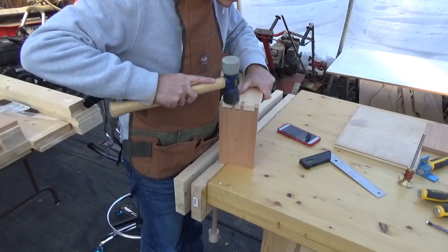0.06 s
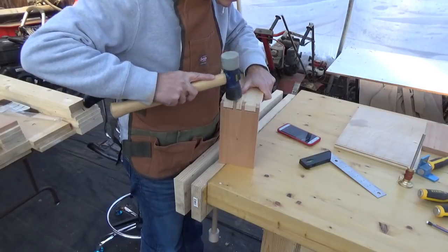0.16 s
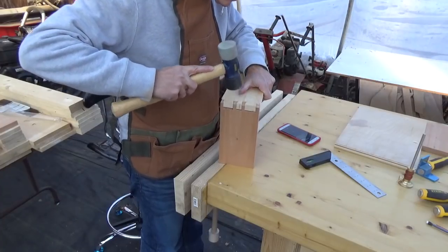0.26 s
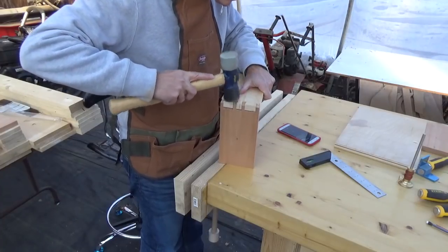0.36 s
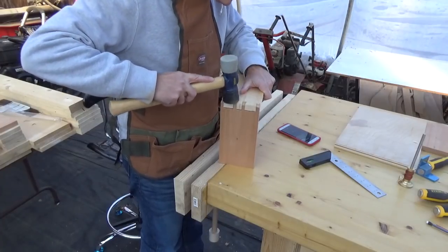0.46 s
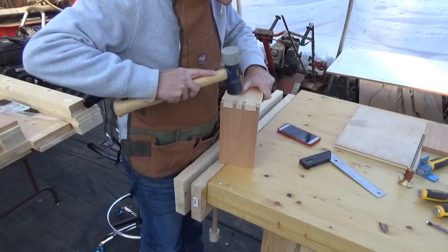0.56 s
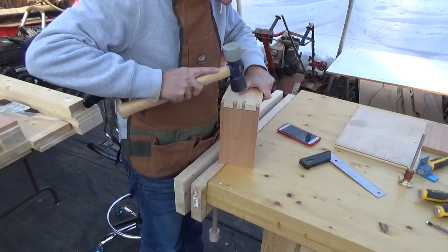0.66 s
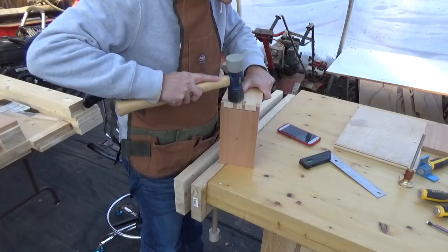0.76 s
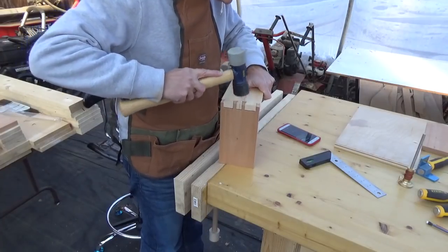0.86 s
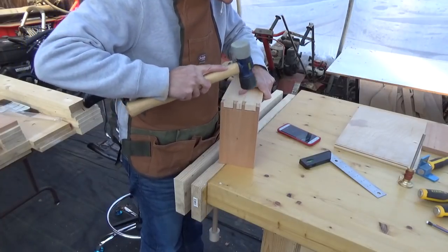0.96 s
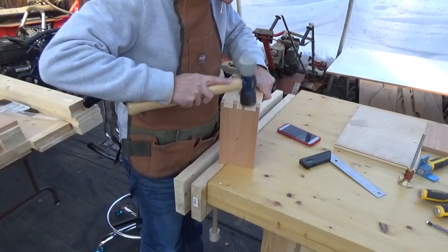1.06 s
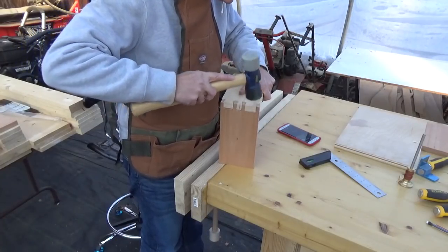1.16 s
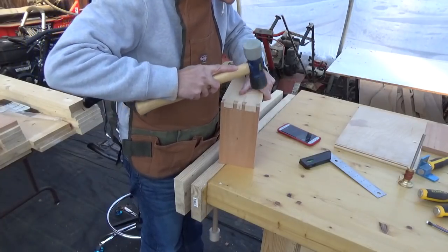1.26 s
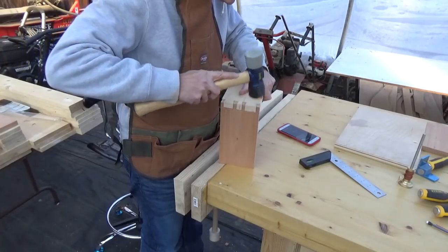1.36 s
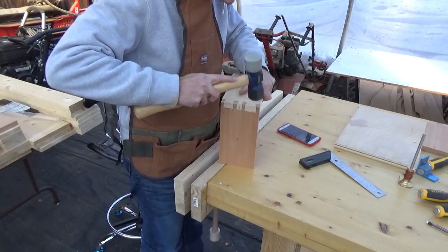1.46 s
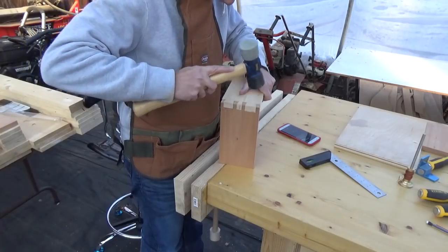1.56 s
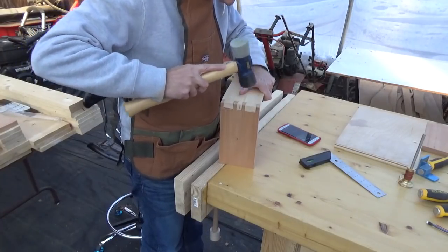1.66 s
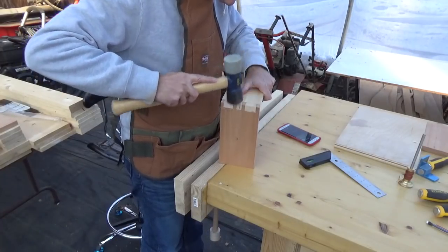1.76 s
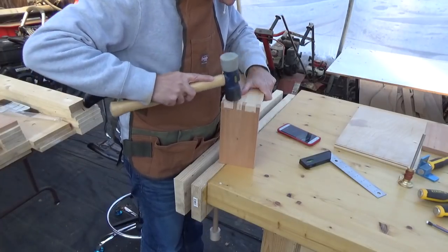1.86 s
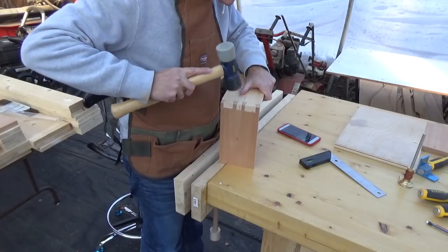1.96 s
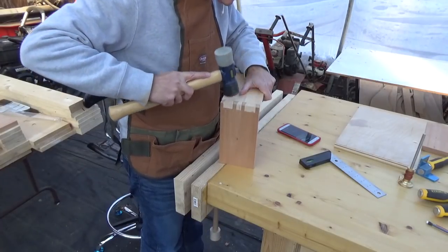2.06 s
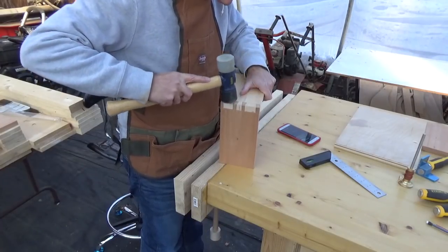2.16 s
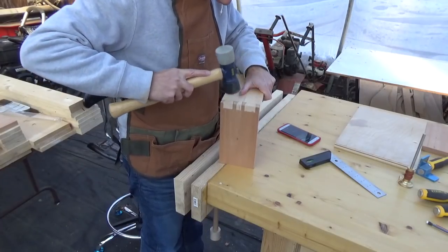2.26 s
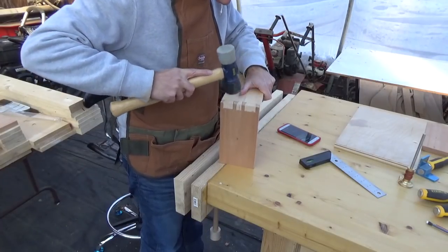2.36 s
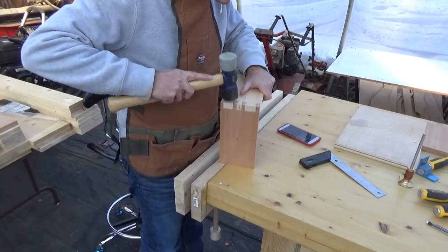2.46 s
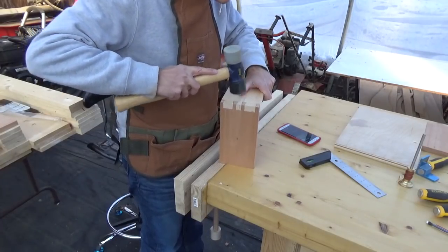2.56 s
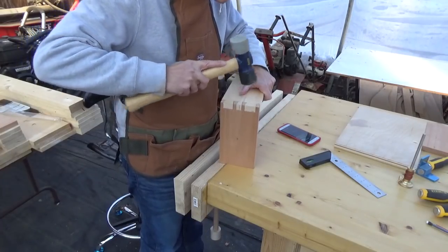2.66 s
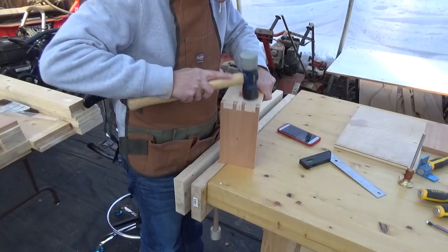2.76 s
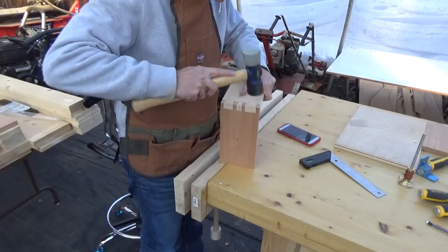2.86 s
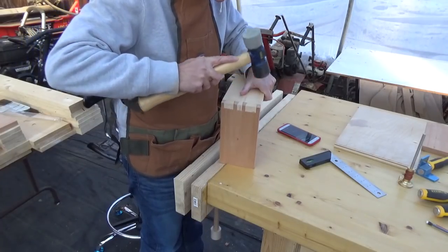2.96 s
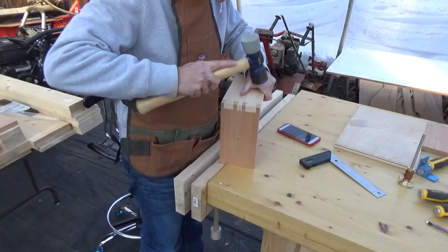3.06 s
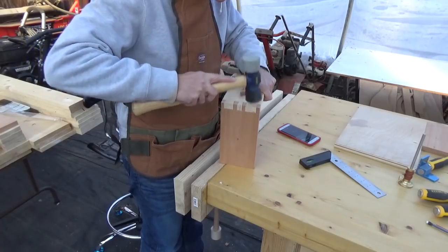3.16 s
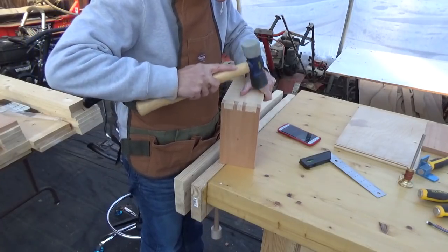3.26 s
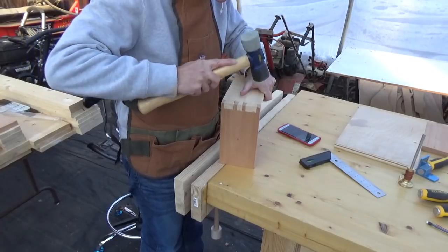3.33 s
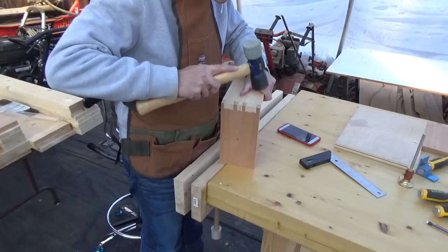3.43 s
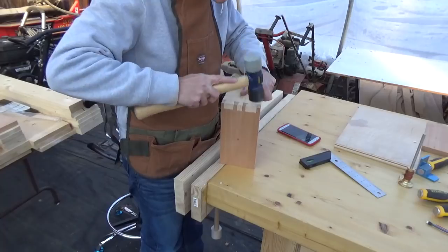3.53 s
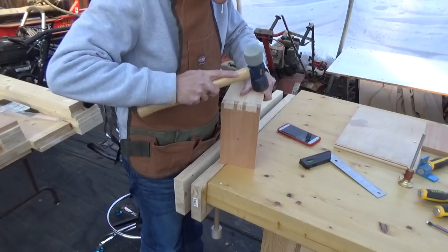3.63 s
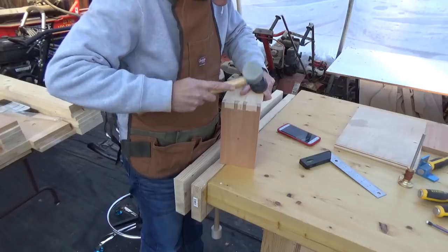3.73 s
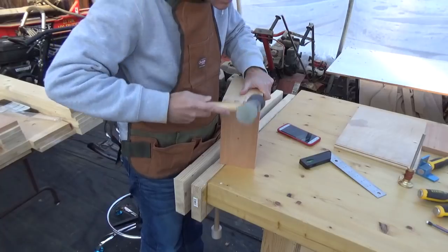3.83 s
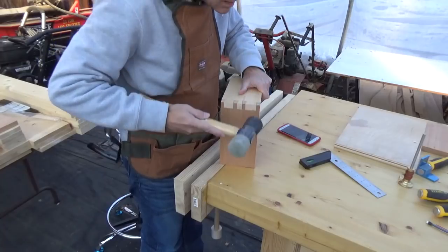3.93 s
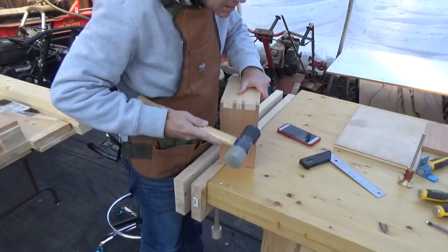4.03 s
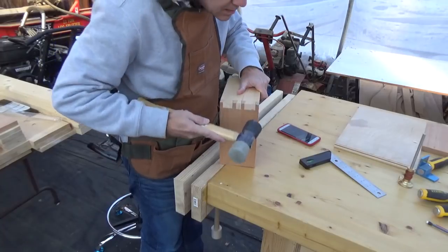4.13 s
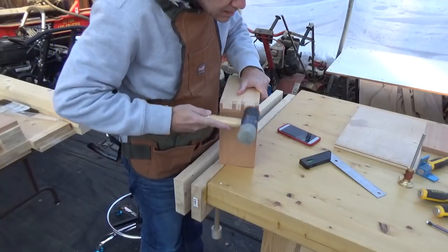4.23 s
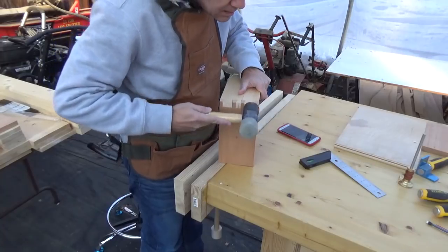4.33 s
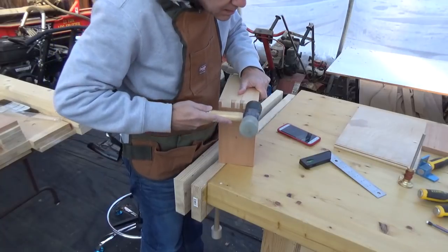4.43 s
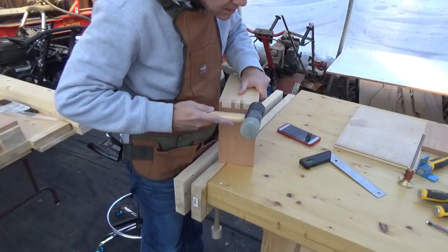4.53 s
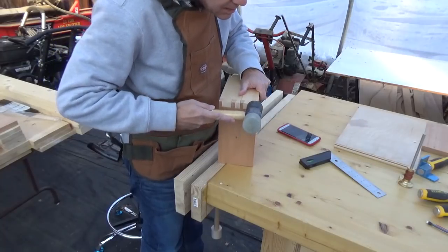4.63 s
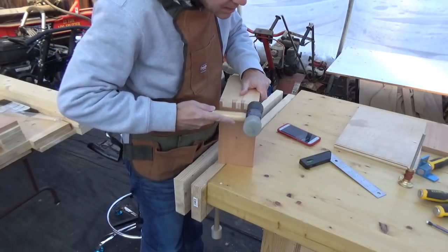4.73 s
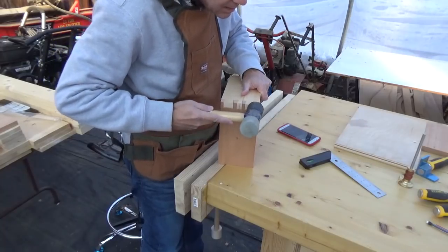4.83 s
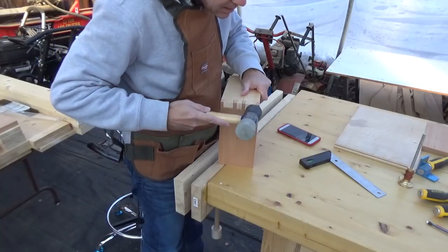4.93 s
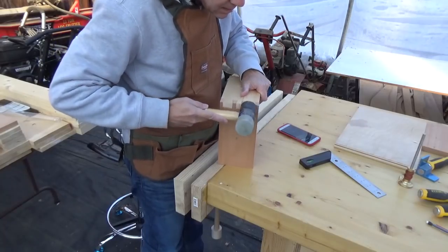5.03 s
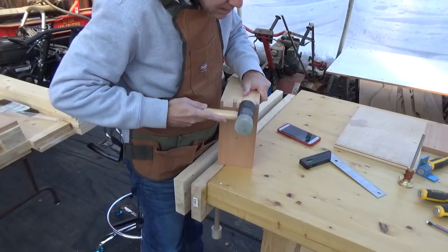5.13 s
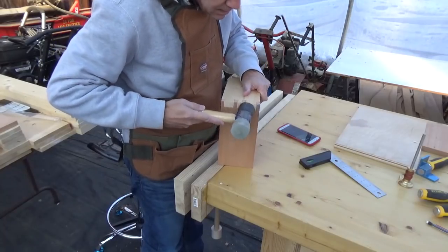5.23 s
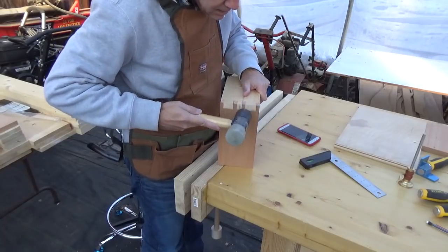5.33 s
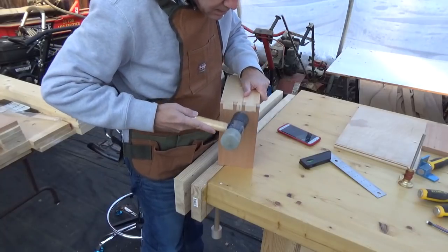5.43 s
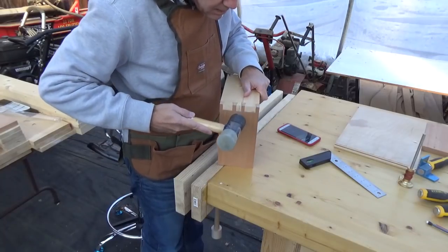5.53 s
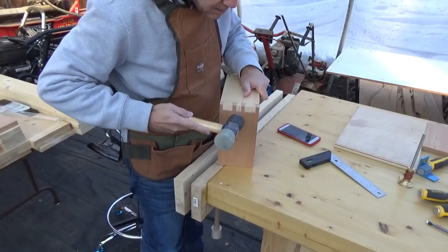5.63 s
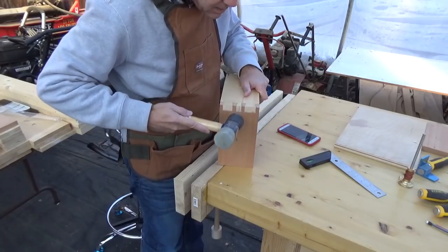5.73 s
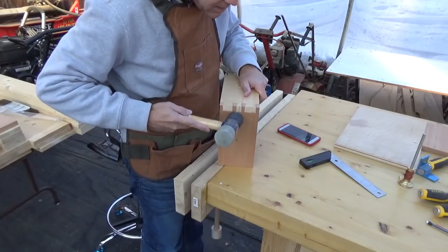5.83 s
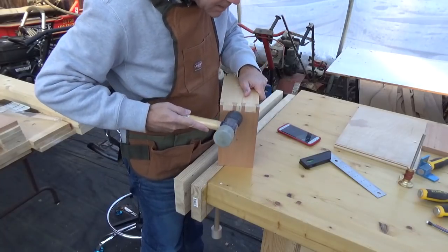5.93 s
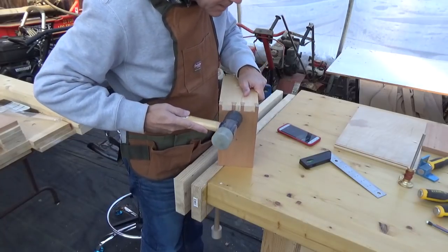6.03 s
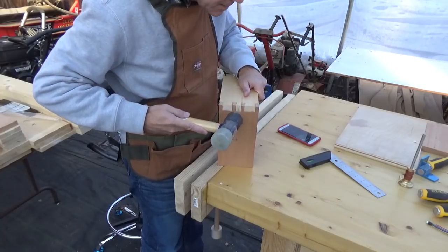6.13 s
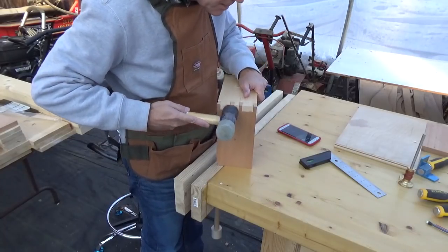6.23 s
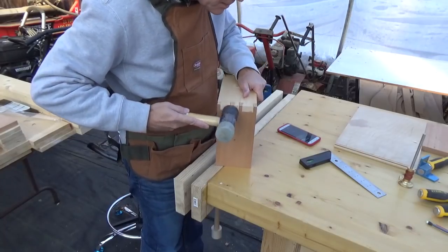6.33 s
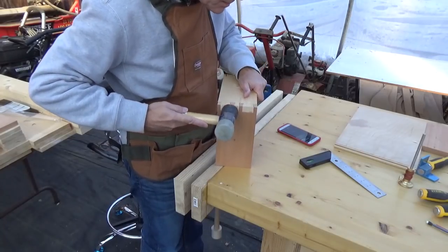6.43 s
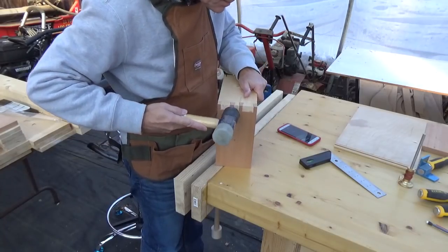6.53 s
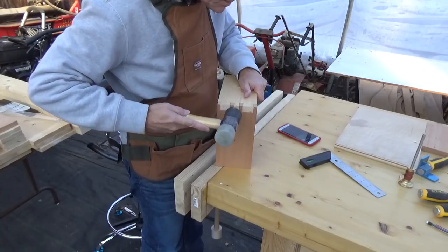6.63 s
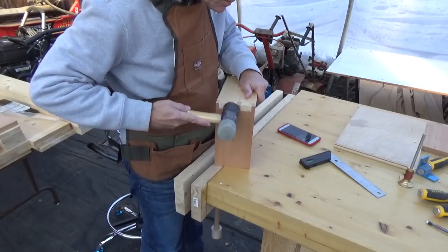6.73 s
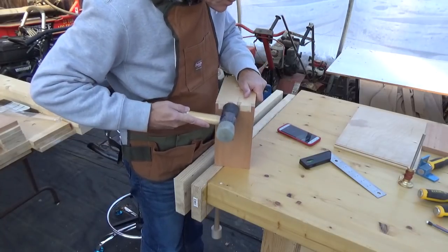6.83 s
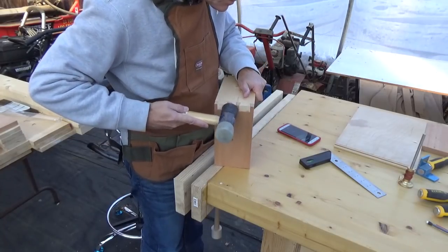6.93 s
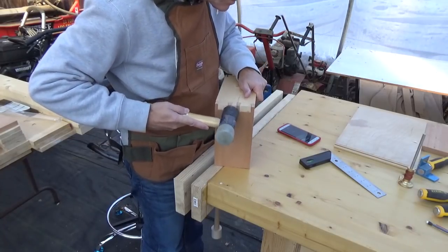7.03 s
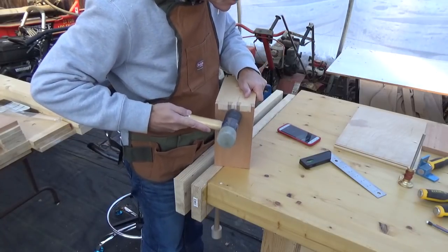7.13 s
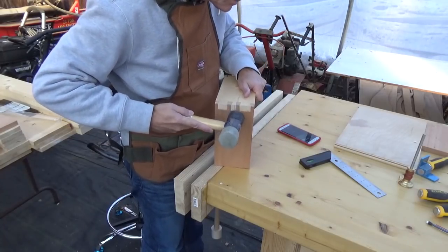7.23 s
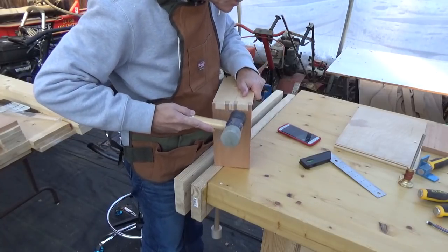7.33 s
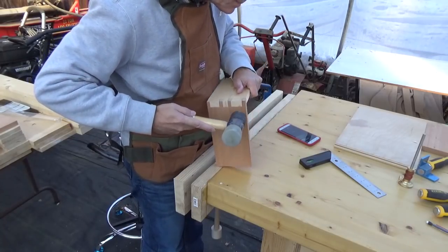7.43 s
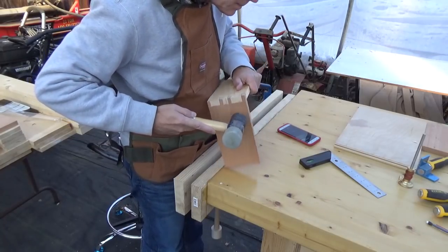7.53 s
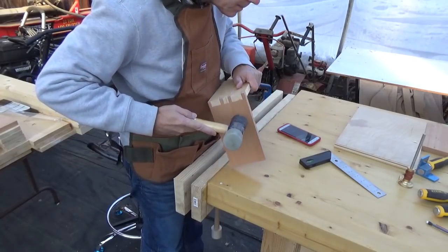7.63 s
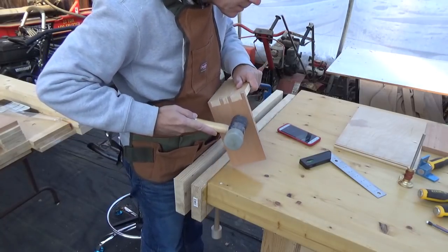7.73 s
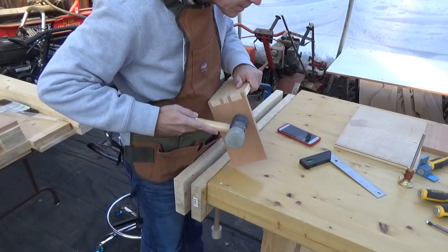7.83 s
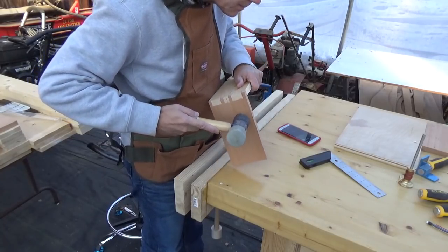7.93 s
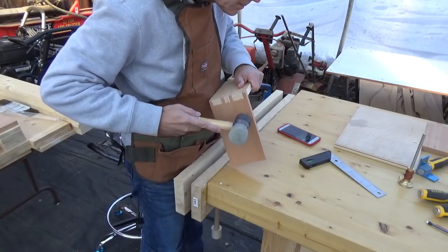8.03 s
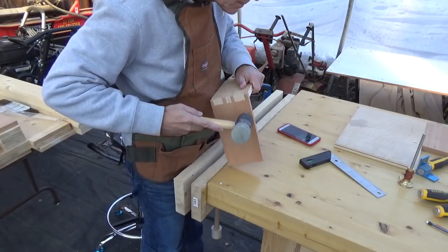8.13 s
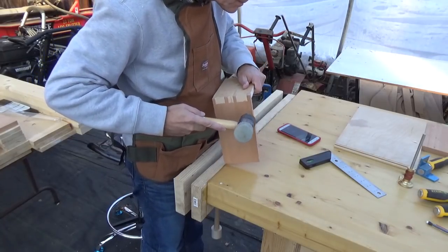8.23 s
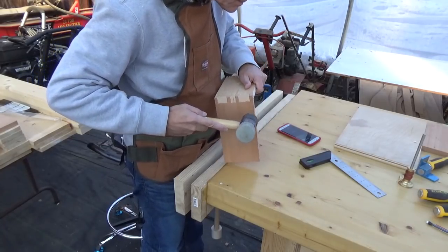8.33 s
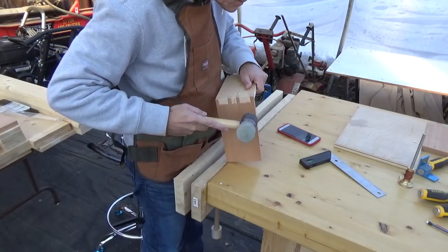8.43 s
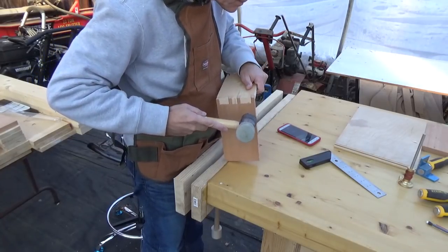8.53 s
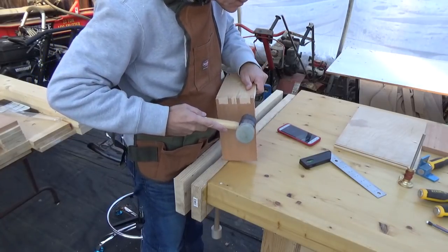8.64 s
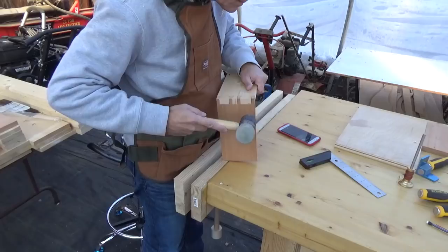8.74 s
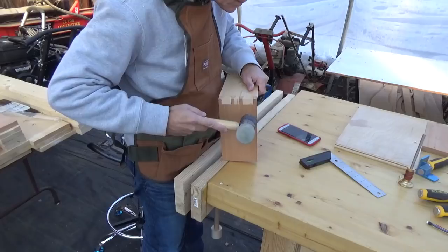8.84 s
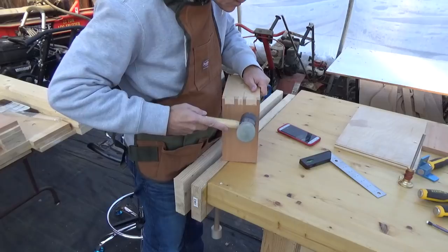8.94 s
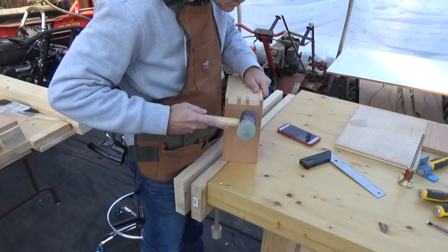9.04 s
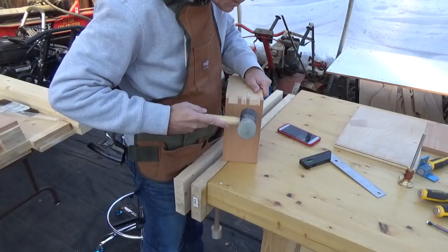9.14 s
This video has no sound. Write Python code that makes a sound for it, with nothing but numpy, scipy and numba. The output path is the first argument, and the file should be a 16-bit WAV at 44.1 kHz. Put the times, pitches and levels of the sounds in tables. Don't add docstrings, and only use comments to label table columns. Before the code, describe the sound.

Quick regular mallet blows thud on a wooden bench, a loose steel tool buzzing, then isolated hollow side taps and small wood scrapes over soft air noise.

```python
import sys
import numpy as np
from scipy import signal
from scipy.fft import rfft, irfft, next_fast_len
from scipy.io import wavfile
from numba import njit

SR = 44100
rng = np.random.default_rng(int(sys.argv[2]) if len(sys.argv) > 2 else 0)


def volts(x):
    e = np.asarray(x, float) / 20
    return 10 ** e


def int16_out(signal):
    q = np.round(np.clip(np.atleast_2d(signal).T, -1, 1) * 32767)
    wavfile.write(sys.argv[1], SR, q.astype(np.int16))


N = 405279
FAST = next_fast_len(N)
RING = int(0.5 * SR)

# frequency in Hz, spectrum level in dB per Hz.
AIR_SPECTRUM = [(15, -52), (25, 1.5), (64, -3.5), (81, -2.5), (104, -4.5), (242, -2), (320, -3.5),
                (363, -4.5), (506, -7.5), (1010, -10), (2790, -20.5), (5410, -21), (11000, -33.5),
                (14400, -98), (22000, -120)]
# frequency in Hz, left-right likeness from 0 to 1.
AIR_LIKENESS = [(60, 1.0), (130, 1), (270, 0.97), (570, 0.94), (1220, 0.69), (2590, 0.6), (5500, 0.76),
                (11700, 0.7)]
# centre in seconds, half length in seconds, rise in dB.
HUM_SWELLS = [
    (7.897, 0.17, 7),
    (8.95, 0.32, 8.5),
]
# start in seconds, peak in dB, board ring in dB, steel chatter in dB.
BLOWS = [(0.093, -9, -0.5, -44), (0.427, -7.5, 0, -28.5), (0.78, -8, -1, -30), (1.122, -6, -4.5, -37),
         (1.46, -1.5, -12, -21.5), (1.828, -8, -30, -39), (2.145, -3, -23, -31), (2.463, 1, -51, -19.5),
         (2.843, 1, -11, -17.5), (3.192, 3.5, -8, -17.5), (3.549, 5, -13, -14.5)]
# frequency in Hz, level in dB, T60 in seconds.
BENCH_MODES = [(101.7, -8.5, 0.21), (214.5, 7, 0.28), (330, 7.5, 0.3), (450, -4, 0.077), (520, -1, 0.12),
               (550, 4, 0.052), (690, 6, 0.077), (756, 3, 0.23), (866, 4.5, 0.088), (940, 6.5, 0.12),
               (1262, -19.5, 1), (1660, -34, 0.12), (1658, -40, 0.2), (1760, -35.5, 0.1), (1750, -42, 0.12),
               (1900, -12, 0.33), (2100, -16, 0.34), (2460, -44.5, 0.74), (2280, -52, 0.31),
               (2470, -30, 0.15)]
# frequency in Hz, spectrum level in dB per Hz.
JOLT_SPECTRUM = [(41, -61), (70, -13.5), (451, -0.5), (647, 1), (927, -2), (1680, -10.5), (1870, -11),
                 (3600, -24.5), (4540, -26), (8040, -35.5), (11000, -49.5), (14400, -75), (22000, -120)]
# frequency in Hz, level in dB, T60 in seconds.
STEEL_MODES = [(2982, -6, .22), (3978, -10, .2), (4183, -7, .2), (4770, -5, .22), (4996, 2, .24),
               (5400, -1, .2), (5539, -7, .25), (6352, -2, .27), (7779, -16, .22), (8253, -7, .3),
               (8796, -15, .22), (9300, -17, .2), (10310, -12, .3)]
# frequency in Hz, spectrum level in dB per Hz.
CLATTER_SPECTRUM = [(1470, 7), (2500, -2.5), (3940, -3), (4890, -11), (6470, -7.5), (7240, -11.5),
                    (10600, -42), (11000, -80), (14400, -96), (22000, -120)]
# start in seconds, peak in dB, high over low ring in dB, crack in dB.
TAPS = [
    (4.2917, -1.5, 6.5, -18),
    (4.6685, -13.5, 0.2, -9),
    (5.0845, -12.5, -7, -14),
    (5.0939, -6, -15, -25),
    (6.2701, -9, -4.5, -13),
    (6.734, -7, 5.5, -6),
]
# frequency in Hz, level in dB, T60 in seconds.
BOX_MODES = [(180, -12, .2), (240, -14, .18), (325, -6, .2), (375, -8, .18), (408, 0, .22), (468, -1, .2),
             (549, -7, .2), (690, -9, .2), (1130, -17, .15), (1200, -11, .2), (1270, -4, .27),
             (1324, -4, .24), (1507, -13, .2), (1750, -20, .15), (3000, -22, .12)]
# frequency in Hz, spectrum level in dB per Hz.
HOLLOW_SPECTRUM = [(41, -49), (70, -42), (271, -5), (406, -11), (607, -1.5), (908, -7.5), (1010, -13),
                   (1250, -1), (1790, -18), (2970, -31), (3300, -35), (5610, -34), (11000, -54),
                   (14400, -72), (22000, -120)]
# start in seconds, length in seconds, level in dB,
# dullness in dB per octave.
SLIDES = [
    (4.632, 0.025, -51.5, -1.4),
    (4.786, 0.071, -54, 0.1),
    (5.035, 0.053, -48, 0.5),
    (6.205, 0.083, -49.5, 2),
    (6.645, 0.22, -53, 4.5),
]
# frequency in Hz, width in Hz, level in dB.
SLIDE_RINGS = [(1327, 250, -0.2), (3440, 640, -0.5), (5850, 990, -3.5)]
# start in seconds, length in seconds, level in dB,
# dullness in dB per octave.
SCUFFS = [
    (7.44, 0.037, -49.5, 0.1),
    (7.85, 0.019, -60, 13),
    (8.538, 0.02, -45.5, -.6),
    (8.9, 0.088, -61, 0.1),
]
# frequency in Hz, width in Hz, level in dB.
SCUFF_RINGS = [(1600, 420, -7), (3520, 720, -5), (5400, 270, -7.5), (6360, 280, -6.5)]
# start in seconds, length in seconds, level in dB, dullness in dB per octave.
BRUSHES = [
    (8.385, 0.045, -52, 1.5),
    (8.86, 0.062, -54, -3),
    (8.99, 0.038, -57, -2),
]
# frequency in Hz, width in Hz, level in dB.
BRUSH_RINGS = [(300, 400, 0), (1900, 2400, 0)]
# start in seconds, peak in dB, frequency in Hz.
TICKS = [
    (5.7697, -35, 2620),
    (7.5572, -48, 2240),
    (7.808, -36, 2940),
]
# frequency in Hz, T60 in seconds, level in dB, left-right likeness from 0 to 1.
ROOM_BANDS = [(126, 0.25, 4.5, 1), (333, 0.17, 4.5, 0.63), (994, 0.31, -1, 0.33), (2700, 0.27, -2.5, 0.78),
              (8500, 0.18, 3, 0.48)]
# frequency in Hz, phase lead of the left in radians.
PORT_LEAD = [(30, -.4), (260, -.7), (600, -.7), (1900, -.3), (4000, -.05), (8300, -.25)]


def unit(x):
    return x / np.sqrt(np.mean(x ** 2))


def on_log(table, hz):
    points = np.array(table, float)
    return np.interp(np.log(np.maximum(hz, 1)), np.log(points[:, 0]), points[:, 1])


def coloured(table, size):
    hz = np.fft.rfftfreq(size, 1 / SR)
    return unit(irfft(rfft(rng.standard_normal(size)) * volts(on_log(table, hz)), size))


def band(x, hz, width_hz):
    return signal.lfilter(*signal.iirpeak(hz, hz / width_hz, fs=SR), x)


def steep_band(x, hz, width_hz):
    return band(band(x, hz, width_hz), hz, width_hz)


def fade(t60):
    return np.exp(-np.log(1000) * np.arange(RING) / SR / t60)


def add(out, s, x):
    i = int(s * SR)
    out[i:i + len(x)] += x[:N - i]


def air():
    t, hz = np.arange(N) / SR, np.fft.rfftfreq(FAST, 1 / SR)
    alike = np.clip(on_log(AIR_LIKENESS, hz) - 0.055 * (hz > 400), 0, 0.999)
    side = irfft(rfft(coloured(AIR_SPECTRUM, FAST)) * np.sqrt((1 - alike) / (1 + alike)), FAST)
    hiss = unit(coloured(AIR_SPECTRUM, FAST) + side * np.array([[1], [-1]]))[:, :N]

    hum = unit(steep_band(rng.standard_normal(N), 73, 30))
    hum_db = -60.5 + sum(db * np.exp(-((t - s) / half) ** 2) for s, half, db in HUM_SWELLS)

    whine = unit(steep_band(rng.standard_normal(N), 2900, 150))
    full_s, rise_db_s, fall_db_s = 1.5, 8.5, 0.9
    whine_db = -63 - np.maximum(rise_db_s * (full_s - t), fall_db_s * (t - full_s))
    return volts(-45) * hiss + volts(hum_db) * hum + volts(whine_db) * whine


def ring(modes, tilt_db, shorten, scatter_db, drift):
    hz, db, t60 = np.transpose(modes)[:, :, None]
    pitch, strength, sign = rng.standard_normal((3, len(modes), 1))
    phase = 2 * np.pi * hz * (1 + drift * pitch) * np.arange(RING) / SR
    level = np.sign(sign) * volts(db + tilt_db[:, None] + scatter_db * strength)
    x = np.sum(level * fade(shorten * t60) * np.sin(phase), axis=0)
    return x / np.sqrt(np.sum(volts(2 * db)))


def crack(t60, hz, width):
    snap = steep_band(rng.standard_normal(RING) * fade(t60), hz, width * hz)
    return snap / np.abs(snap).max()


def bounces(start_s, gap_s, swell_s, t60, scatter_db, count):
    hits = np.zeros(RING)
    sign, strength = rng.standard_normal((2, count))
    after = np.cumsum(gap_s * rng.exponential(size=count)) * (np.arange(count) > 0)
    swell = np.minimum(0.45 + after / swell_s, 1)
    size = swell * volts(scatter_db * strength - 60 * after / t60)
    hits[((start_s + after) * SR).astype(int) % RING] = np.sign(sign) * size
    return hits / np.sqrt(np.sum(hits ** 2))


def chatter():
    steel = ring(STEEL_MODES, np.zeros(len(STEEL_MODES)), shorten=0.13, scatter_db=1.5, drift=0.001)
    click = volts(10.5) * coloured(CLATTER_SPECTRUM, RING) * fade(0.011)
    hits = bounces(0.018, 0.0014, 0.015, 0.13, scatter_db=0, count=90)
    return signal.fftconvolve(hits, steel + click)[:RING]


def blows():
    out, modes = np.zeros(N), BENCH_MODES[1:]
    hz = np.array(modes)[:, 0]
    shudder = np.exp(-(np.arange(RING) / SR / 0.052) ** 2)
    for s, db, ring_db, steel_db in BLOWS:
        crack_db = -9.5 - 2.1 * max(steel_db + 24.5, 0)
        body = ring(modes, np.where(hz > 800, ring_db + 7, 0), shorten=0.53, scatter_db=-0.5, drift=0.0055)
        knocks = bounces(0, 0.0037, 0.03, 0.28, scatter_db=2.5, count=16)
        body = signal.fftconvolve(knocks, body)[:RING]
        jolt = coloured(JOLT_SPECTRUM, RING) * fade(0.23) * shudder
        wood = volts(-3.6) * body + volts(-0.74) * jolt
        wood = wood * (1 - fade(0.005))
        snap = volts(crack_db + 5) * crack(0.015, 3300, 1.5)
        steel = volts(steel_db + 11) * chatter()
        add(out, s - 0.001, volts(db - 5.5) * (wood + snap + steel))
    return out


def thud():
    t, hz = np.arange(RING) / SR, BENCH_MODES[0][0] * (1 + 0.0045 * rng.standard_normal())
    peak_s, width_s = 0.04, 0.024
    thump = np.sin(2 * np.pi * hz * t) * np.exp(-((t - peak_s) / width_s) ** 2)
    sway = np.sin(2 * np.pi * 108 * t) * fade(0.55) * (1 - fade(0.25))
    return thump + volts(-4) * sway


def rocking():
    out = np.zeros(N)
    for k, (s, db, *_) in enumerate(BLOWS):
        slack_db = -14 * (k == 0)
        add(out, s, volts(-22 + 0.64 * db + slack_db) * thud())
    for s, *_ in TAPS:
        add(out, s, volts(-40.5) * thud())
    return out


def taps():
    out, box = np.zeros(N), np.array(BOX_MODES)
    low, high = box[box[:, 0] < 1000], box[box[:, 0] > 1000]
    for s, db, tilt_db, crack_db in TAPS:
        low_db = -8.5 - 10 * np.log10(1 + volts(2 * tilt_db))
        cavity = ring(low, np.zeros(len(low)), shorten=0.51, scatter_db=-0.5, drift=0.003)
        cavity = cavity * (1 - fade(0.041))
        wall = ring(high, np.zeros(len(high)), shorten=0.44, scatter_db=3.1, drift=0.0035)
        body = volts(low_db + 10.5) * (cavity + volts(tilt_db - 5.5) * wall)
        jolt = volts(-10.5) * coloured(HOLLOW_SPECTRUM, RING) * fade(0.17)
        snap = volts(crack_db + 12.5) * crack(0.0069, 3090, 0.84)
        add(out, s, volts(db) * (body + jolt + snap))
    return out


def rub(out, strokes, rings):
    for s, length, db, dull in strokes:
        size = int(length * SR)
        grit = rng.standard_normal(size) * np.hanning(size) ** 0.47
        for hz, width_hz, ring_db in rings:
            level_db = db + ring_db - dull * np.log2(hz / 3500)
            add(out, s, volts(level_db) * unit(steep_band(grit, hz, width_hz)))


def handling():
    out = np.zeros(N)
    rub(out, SLIDES, SLIDE_RINGS)
    rub(out, SCUFFS, SCUFF_RINGS)
    rub(out, BRUSHES, BRUSH_RINGS)
    for s, db, hz in TICKS:
        tick = band(rng.standard_normal(RING) * fade(0.013), hz, 0.85 * hz)
        add(out, s, volts(db) * tick / np.abs(tick).max())
    return out


def room(x, wet_db):
    tails = 0
    for hz, t60, db, alike in ROOM_BANDS:
        shared, left, right = (unit(band(rng.standard_normal(RING), hz, 0.83 * hz)) for _ in range(3))
        pair = np.sqrt(alike) * shared + np.sqrt(1 - alike) * np.array([left, right])
        tails = tails + volts(db) * np.sqrt(hz / t60) * fade(t60) * pair
    tails = tails * (1 - fade(0.042))
    tails = volts(wet_db) * tails / np.sqrt(np.sum(tails ** 2) / 2)
    tails[:, 0] = 1
    return signal.fftconvolve(x[None], tails, axes=1)[:, :N]


def ports(pair, pan_db, lead):
    hz, way = np.fft.rfftfreq(FAST, 1 / SR), np.array([[0.5], [-0.5]])
    louder = volts(way * pan_db / (1 + (hz / 3000) ** 2))
    earlier = np.exp(1j * way * lead * on_log(PORT_LEAD, hz))
    return irfft(rfft(pair, FAST) * louder * earlier, FAST)[:, :N]


def scene():
    above = ports(room(blows(), wet_db=-2.5) + rocking(), pan_db=-2.8, lead=1)
    side = ports(room(taps(), wet_db=-5.5), pan_db=-0.96, lead=0.63)
    return above + side + room(handling(), wet_db=-8.5) + air()


@njit
def follow(x, attack, release):
    e, out = 0., np.empty(len(x))
    for i in range(len(x)):
        e += (x[i] - e) * (attack if x[i] > e else release)
        out[i] = e
    return out


def top_cut(x):
    return signal.sosfilt(signal.butter(12, 12270, fs=SR, output="sos"), x)


def record(dry):
    level = follow(np.abs(dry).max(axis=0), 1 / (0.00026 * SR), 1 / (0.0067 * SR))
    x = dry * np.minimum(1, volts(-13) / (level + 1e-9)) ** 0.58

    pace = 1 / (0.7 * SR)
    average_db = 10 * np.log10(follow(np.mean(x ** 2, axis=0), pace, pace) + 1e-12)
    x = x * volts(-0.65 * np.maximum(average_db + 24.5, 0))

    x = 0.95 * np.tanh(x / 0.78)
    x = signal.sosfilt(signal.butter(2, 60, "high", fs=SR, output="sos"), x)
    x = signal.sosfilt(signal.ellip(10, 0.2, 62, 11000, fs=SR, output="sos"), x)
    return top_cut(x)


dry = scene()
out = record(dry)
int16_out(out)
```